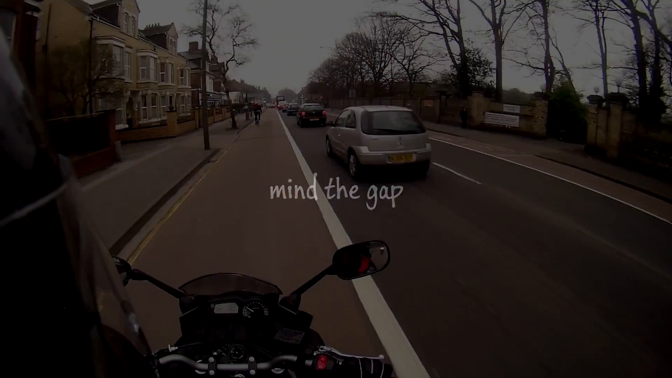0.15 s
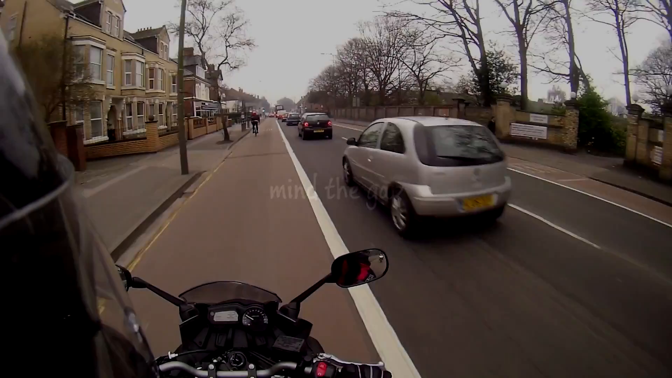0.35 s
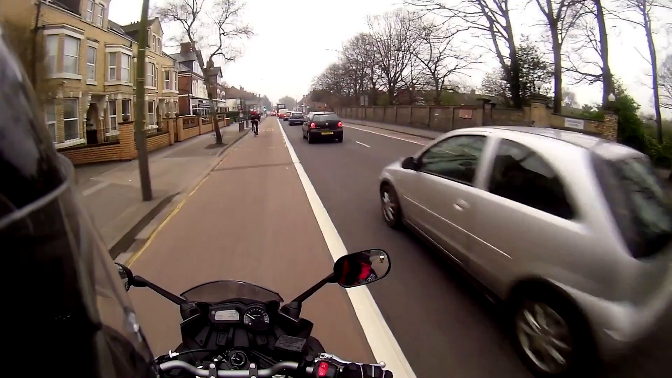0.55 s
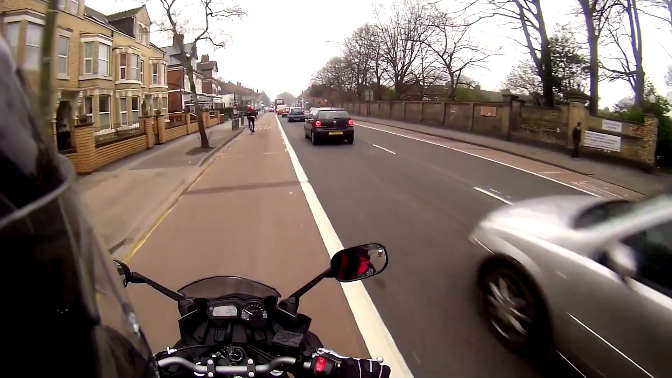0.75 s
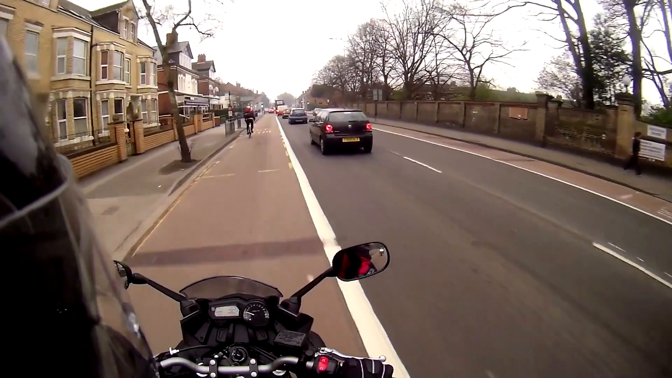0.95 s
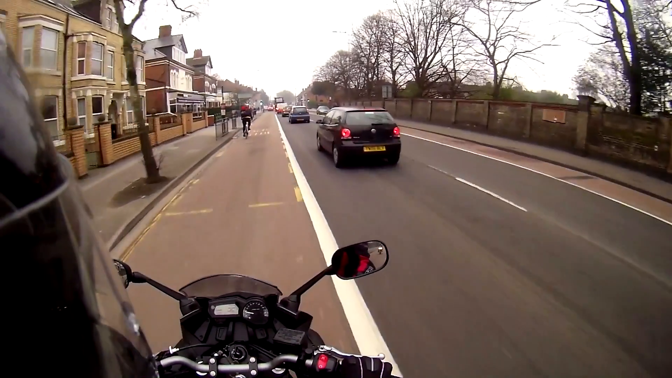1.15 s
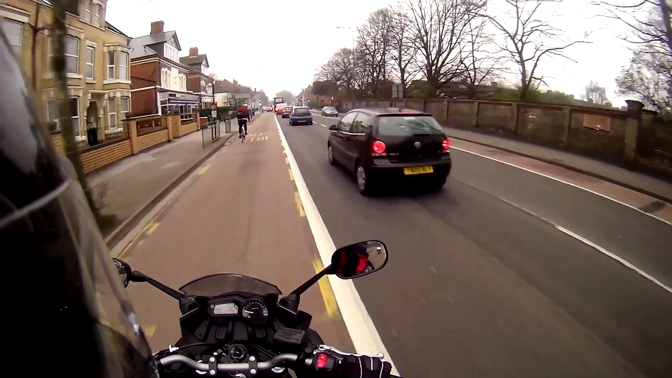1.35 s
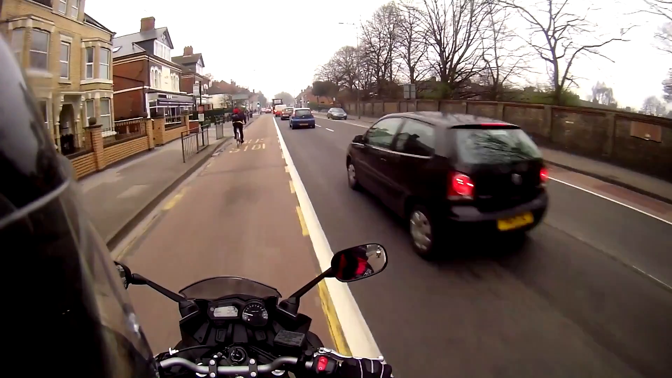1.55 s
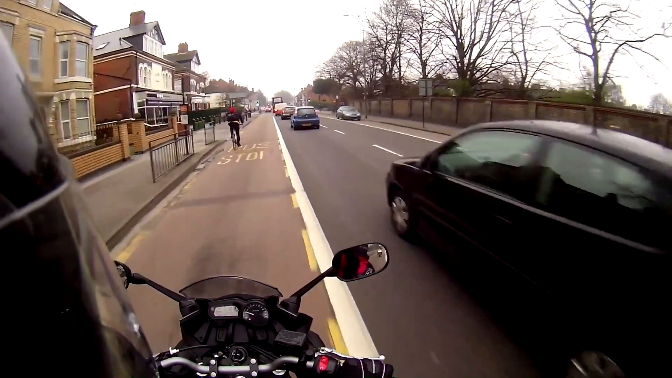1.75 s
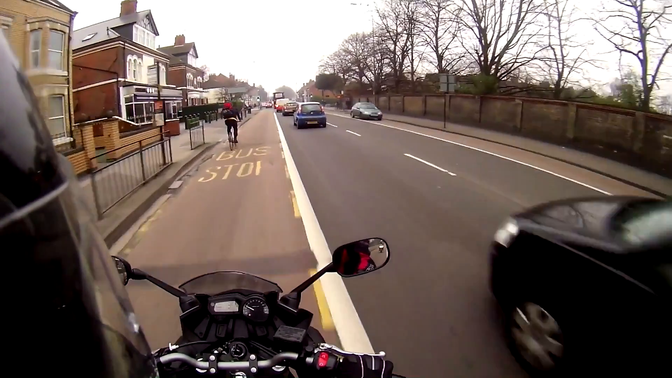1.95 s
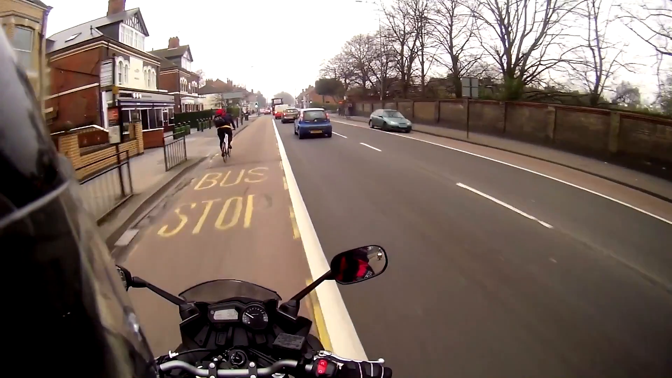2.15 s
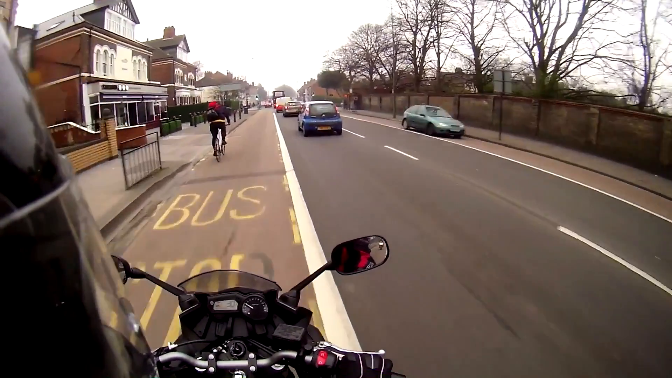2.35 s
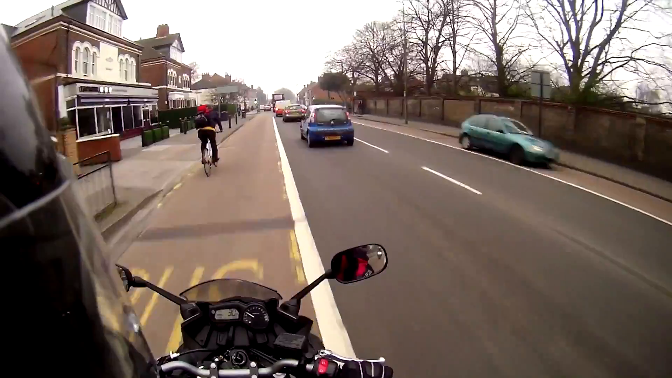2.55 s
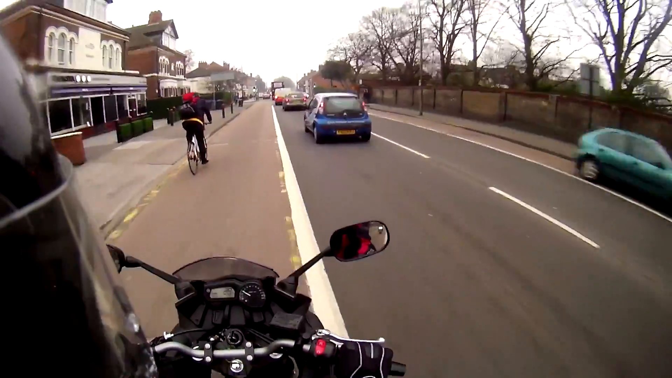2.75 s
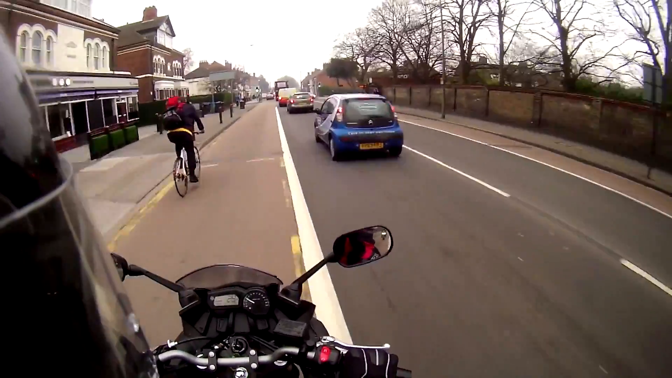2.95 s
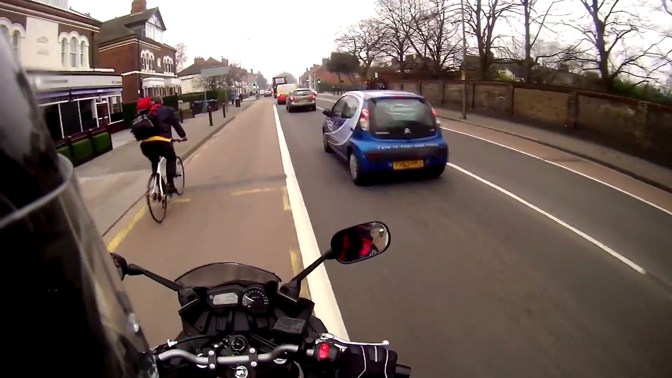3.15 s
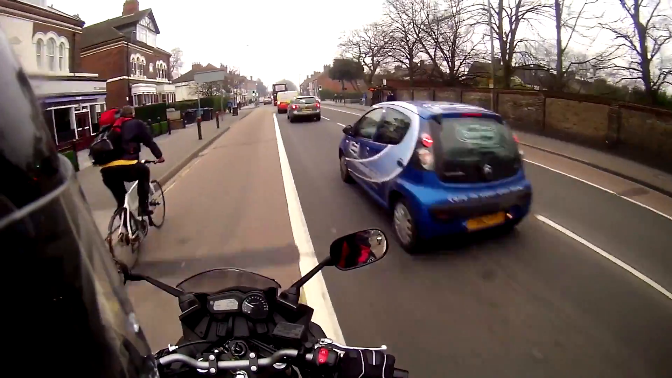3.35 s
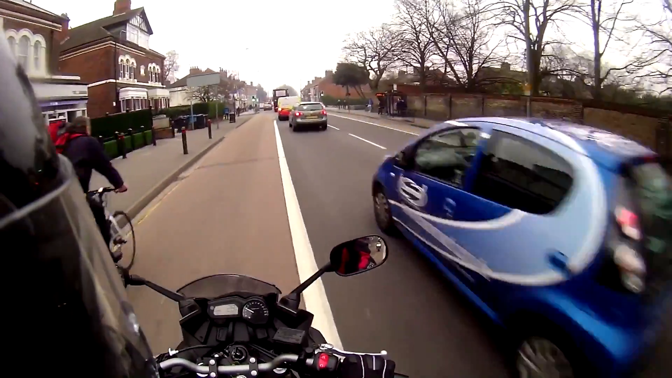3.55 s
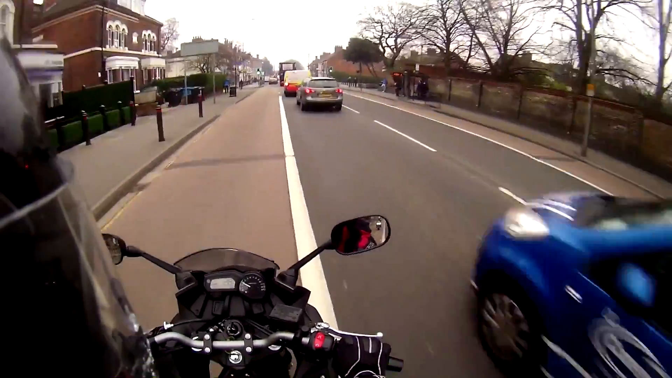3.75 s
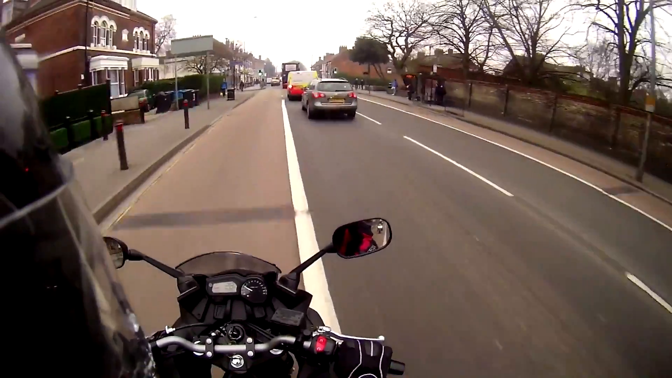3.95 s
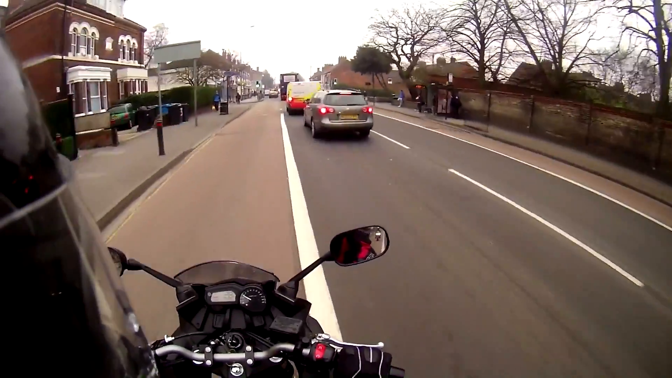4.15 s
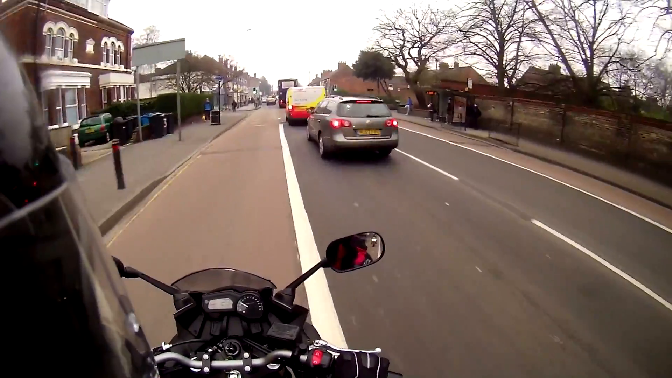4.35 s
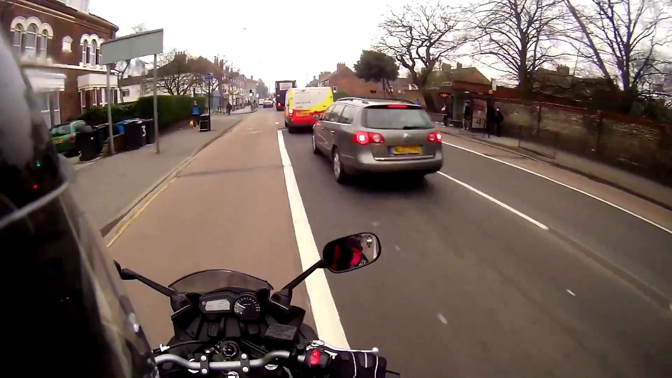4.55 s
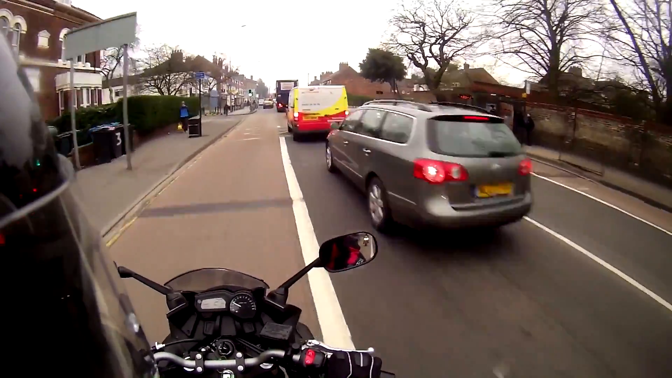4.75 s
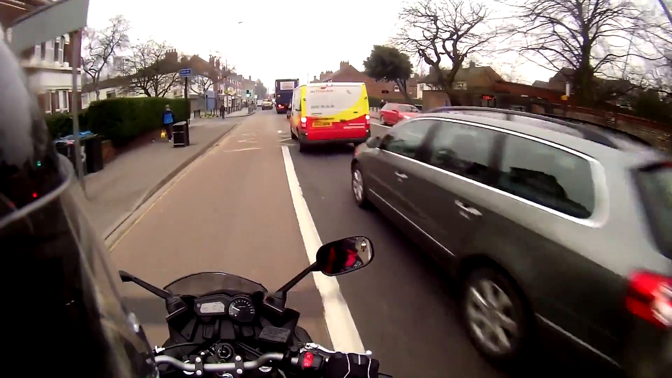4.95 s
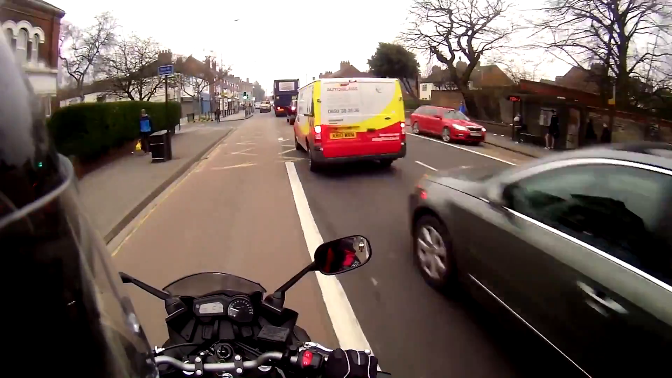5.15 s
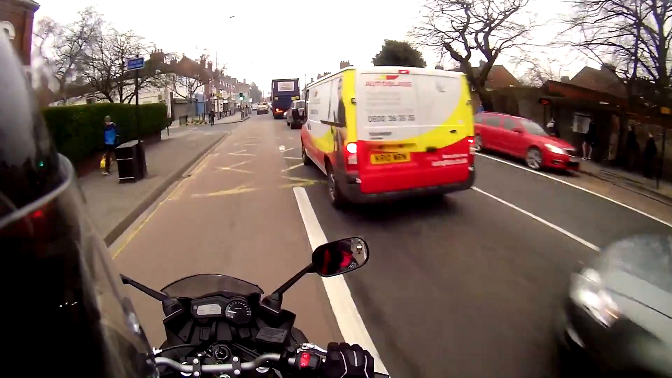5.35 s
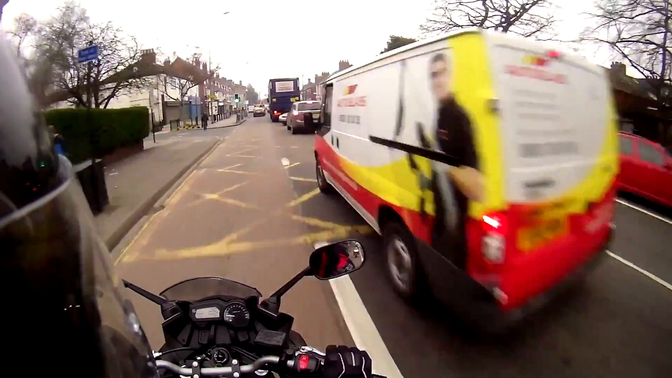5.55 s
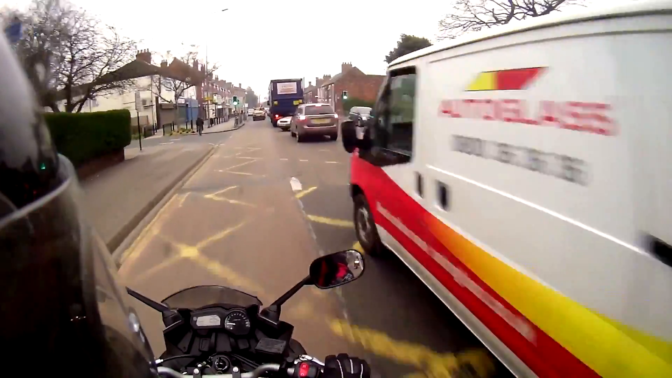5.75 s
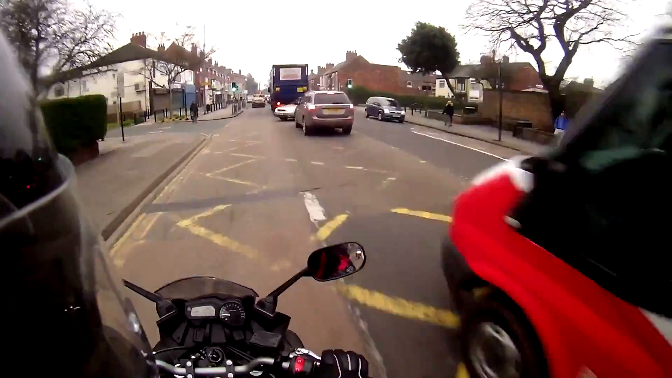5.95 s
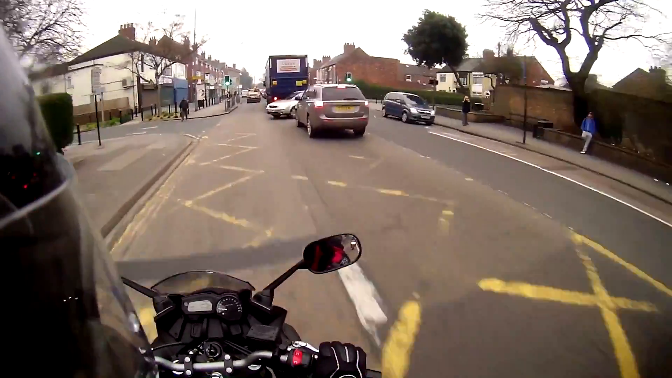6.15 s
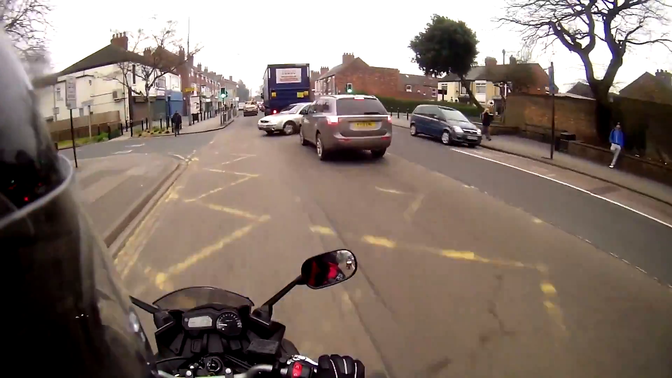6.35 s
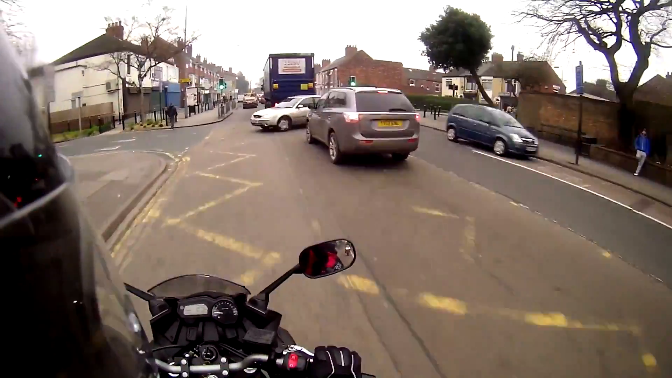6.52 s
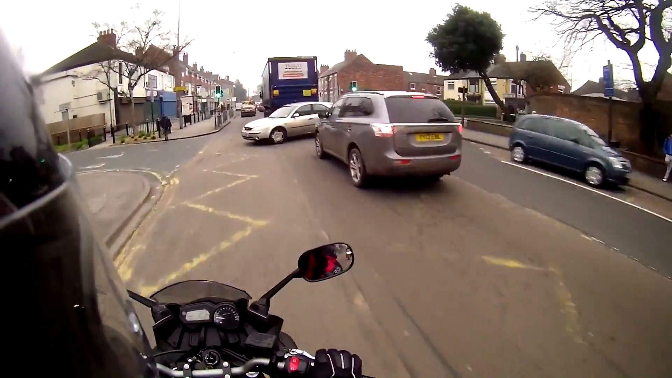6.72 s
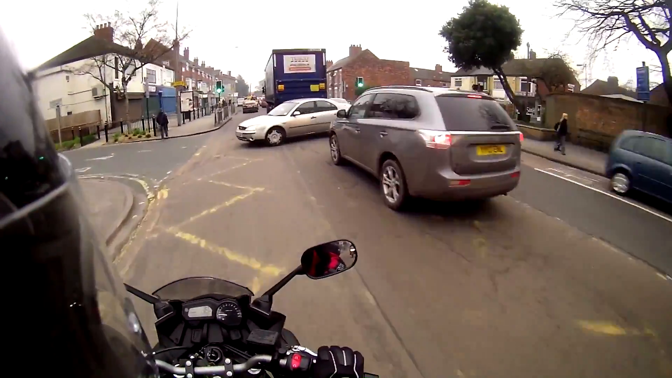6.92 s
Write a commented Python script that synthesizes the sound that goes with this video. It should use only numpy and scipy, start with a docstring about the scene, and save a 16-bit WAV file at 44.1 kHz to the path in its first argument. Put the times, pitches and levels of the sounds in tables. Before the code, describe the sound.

Wind rumble fades in abruptly and batters the microphone in irregular gusts. Under it a motorcycle engine hums low, rises with a downshift in the first second, slowly descends, and falls to idle around five seconds. Tyre and air hiss swell slightly beside passed cars; tiny squeaks and rasps, a wavering low howl and thin whines stay faint. Outdoor road, close onboard perspective, calmer at the end.

```python
"""On the road, beside a queue of cars: a helmet camera on a four-cylinder motorcycle that slows down.
Wind buffets the microphone port over the roar of air and tyres, all shaped noise, with narrow noise bands howling.
The engine, a stack of wavering sines, drops a gear, brakes the bike, and falls to idle when the clutch is pulled.
Squeaks are dying rings, rasps are puffs of noise, whines are soft-edged sines.
The camera housing colours the buffeting, the air and the rasps with its resonances."""
import sys
import numpy as np
from scipy import signal
from scipy.io import wavfile
from scipy.ndimage import uniform_filter1d

SR = 44100
rng = np.random.default_rng(int(sys.argv[2]) if len(sys.argv) > 2 else 0)


def to_wav(s):
    """Save 16-bit WAV."""
    ch = np.atleast_2d(s).T  # columns
    pcm = np.round(np.clip(ch, -1, 1) * 32767)  # PCM
    wavfile.write(sys.argv[1], SR, pcm.astype(np.int16))


N = 312228

# Engine speed through downshift, engine braking, clutch pull and idle: (time [s], crank speed [turns/s])
CRANK_SPEED = [(0.0, 46.4), (0.55, 46.5), (0.95, 52.4), (1.15, 51.6), (2.4, 48.2), (2.8, 46.3),
               (3.86, 44.2), (3.96, 43), (4.07, 43.9), (4.58, 42.8), (4.65, 43.5), (4.74, 42.1),
               (4.82, 43.1), (4.89, 41.2), (4.94, 33.4), (5.07, 32.2), (5.2, 27.5), (5.32, 24.4),
               (5.55, 22.8), (7.08, 22.5)]
# How hard the engine works: (time [s], effort [dB])
ENGINE_EFFORT = [(0.0, -6), (0.55, -5), (1.0, -2.5), (1.3, 0), (2.3, -5), (2.7, -5.5), (3.1, 1),
                 (3.5, -0.5), (3.9, 3), (4.0, 3.5), (4.45, 6), (4.85, 4), (4.92, 3), (4.98, 4), (5.1, -1),
                 (5.35, -1), (5.55, 0.5), (6.3, -0.5), (6.7, -1), (7.08, -0.5)]
# Loud engine partials: (multiple of crank speed, ...)
LOUD_ORDERS = (2, 4, 6, 10, 12, 3, 8, 17)
# One row per loud order: (level in gear [dB], level at idle [dB], share of the effort it follows)
ORDER_LEVELS = [(-36, -46, 0.46), (-46.5, -45, 0.54), (-50, -41, 0.51), (-49, -56, 0.42),
                (-48.5, -51, 1.43), (-46.5, -45, 0.27), (-54, -52, 0.2), (-76, -52, 1.2)]
# Orders left by uneven cylinders: (multiple of crank speed, level relative to order 10 [dB])
UNEVEN_ORDERS = [(5, -9), (7, -11.5), (11, -3.5), (14, -2), (22, -7)]
# Silencer, fading the uneven orders above its corner: (corner [Hz], slope [dB per octave])
SILENCER = (560, 60)
# Exhaust resonance that lifts an order passing through it: (frequency [Hz], width [Hz], boost [dB])
EXHAUST_PIPE = (505, 50, 3)
IN_GEAR_HZ, IDLE_HZ = 40, 24  # crank speeds between which the two order levels blend

# Levels of the moving air, lower at the end than in full ride:
# (time [s], buffeting [dB], air roar [dB], tyre rush [dB], treble hiss [dB])
RIDE_LEVELS = [(0.0, -31.5, -40.5, -56, -71), (0.15, -20.5, -36.5, -51.5, -66.5),
               (0.6, -19, -30, -49, -68.5), (1.0, -16.5, -31, -49.5, -65.5), (1.5, -22, -35, -48, -63.5),
               (2.3, -20, -33, -46.5, -62), (3.2, -18, -33.5, -47.5, -63.5), (4.0, -24, -35, -50, -64),
               (4.9, -22, -35.5, -50, -64.5), (5.35, -23.5, -37, -50.5, -67), (5.9, -28.5, -37, -52.5, -66),
               (6.35, -28.5, -40.5, -53.5, -68), (6.6, -36, -40, -53, -69.5), (7.08, -35, -46, -54, -71)]
# Gusts (+) and lulls (-) of the wind at the port: (time [s], level change [dB], width [s])
GUSTS = [(.28, 2.5, 0.042), (.37, 2, 0.033), (.5, -8, 0.049), (.75, 5, 0.03), (.83, 3.5, 0.04),
         (.94, 0.5, 0.041), (1.01, -18, 0.071), (1.15, 2, 0.062), (1.25, -7.5, 0.06), (1.32, 16, 0.014),
         (1.44, -4, 0.098), (1.58, 5.5, 0.078), (1.68, 8.5, 0.068), (1.76, 10, 0.03), (2.13, -7, 0.083),
         (2.2, 7.5, 0.1), (2.3, 7.5, 0.064), (2.54, -5.5, 0.025), (2.77, 4, 0.053), (2.85, -7.5, .05),
         (3.0, -9, 0.025), (3.2, -9.5, 0.15), (3.4, 4, 0.033), (3.55, -5.5, 0.041), (3.62, 6.5, 0.032),
         (4.14, 3, 0.25), (4.3, -4, 0.067), (4.48, -7.5, 0.068), (4.54, 17, 0.024), (4.89, -14.5, 0.032),
         (5.11, -7.5, 0.019), (5.33, 7, 0.15), (6.42, 3.5, 0.055)]
# Slow swelling (+) and thinning (-) of the buffeting: (time [s], level change [dB], width [s])
SWELLS = [(2.5, -1.5, 1), (3.2, -1.5, .5), (4.4, 2.5, 1), (5.8, -2, .6)]
# Cars passed throw the noise back: (time alongside [s], hiss lift [dB], width [s])
CAR_PASSES = [(.6, 6.5, 0.67), (1.93, 2, 0.3), (3.75, 2, 0.26), (5.0, .5, 0.17), (5.95, 2.5, 0.35)]
# Noise colours: (frequency [Hz], relative level [dB])
BUFFET_COLOUR = [(5.9, -31), (10, 5), (22, 3), (41, -3.5), (92, -12), (119, -26.5), (250, -31.5),
                 (320, -43.5), (550, -120)]
ROAR_COLOUR = [(59, -36.5), (100, -3.5), (119, 1.5), (231, -11), (463, -10.5), (509, -12), (801, -25.5),
               (1000, -27.5), (1300, -64), (2200, -120)]
RUSH_COLOUR = [(380, -16), (650, -1.5), (823, -15), (1130, -6), (1720, -12.5), (2310, -15), (2930, -23),
               (4000, -32), (5200, -57), (8800, -120)]
HISS_COLOUR = [(1650, -21), (2800, -3.5), (4530, -10), (5640, -10), (6500, -15), (7920, -13), (10500, -19),
               (11600, -32.5), (13000, -60.5)]
RASP_COLOUR = [(700, -2), (1500, 6), (2300, 8), (3300, -3), (5900, -2), (6800, -17), (8800, -12),
               (10500, -27), (12000, -45)]
# Resonances of the camera housing: (frequency [Hz], width [Hz], boost [dB])
HOUSING = [(470, 95, -0.5), (1083, 250, 3.5), (4160, 200, 0.5), (5300, 100, 1), (7860, 650, 1.5)]
DEEP_SPLIT_HZ = 45  # parts deep thumps from flutter
DEEP_DB, DEEP_PER_GUST_DB = -2, 0.5  # share of the deep thumps, and its growth per dB of gust
LUMPS_PER_S, LUMP_DB, DEEP_LUMP_DB = 30, 2.5, 2.5  # upper rate of the thumping; depth above and under the split
SHAKE_DB = 2  # the engine shakes the port once per firing cycle
HEADROOM = 0.38  # the largest pressure lumps flatten out near this height
ROAR_PER_GUST_DB, RUSH_PER_PASS_DB = 0.04, 0.5  # roar lift per dB of gust, rush lift per dB of pass

# Narrow noise bands howling at fixed pitches: (time [s], low howl [dB], high howls [dB])
HOWL_LEVELS = [(0, -62, -58), (.4, -62, -53), (1.1, -69, -73), (1.8, -44, -50), (2.2, -41.5, -54),
               (2.5, -51, -49.5), (2.85, -44, -52), (3.3, -52.5, -52), (4, -44.5, -52.5), (4.8, -50, -53),
               (5.2, -69, -64), (7.08, -51, -82)]
# The low howl: (frequency [Hz], width [Hz])
LOW_HOWL = (506, 22.3)
# The high howls: (frequency [Hz], width [Hz], relative level [dB])
HIGH_HOWLS = [(2020, 62, -10.5), (2318, 270, -9.5), (1595, 37, -21)]

# Thin squeaks: (time [s], level [dB], frequency [Hz], time to fall 60 dB [s])
SQUEAKS = [(.927, -63, 6230, .35), (.558, -65, 8000, 0.065), (.572, -63, 8000, .06),
           (5.056, -61, 5850, .08), (5.225, -66, 5900, .08)]
# Short rasps of lever and linkage: (time [s], level [dB], length [s])
RASPS = [(0.641, -47, 0.022), (.657, -57.5, .035), (0.906, -57, 0.026), (1.885, -61, 0.03),
         (5.63, -65, 0.03)]
# Thin whines and hums: (time [s], length [s], first pitch [Hz], last pitch [Hz], level [dB])
WHINES = [(4.2, .55, 1475, 1478, -65), (2.12, .5, 668, 655, -52), (6.05, .9, 1135, 1129, -63),
          (4.75, 1.55, 131, 109, -39), (1.78, .52, 4224, 4198, -78), (5.74, .26, 4140, 4200, -80),
          (5.98, .06, 4205, 4165, -75)]

FLOOR_DB, EDGE_HZ = -78.5, 14280  # microphone noise ahead of the filters, upper band limit


def gain_of(db):
    """Turns decibels into an amplitude factor."""
    return 10 ** (np.asarray(db) / 20)


def unit_rms(x):
    """Scales a signal to rms 1."""
    return x / np.sqrt(np.mean(x ** 2) + 1e-20)


def smooth_twice(x, size):
    """Two running means in a row, for a rounder average."""
    return uniform_filter1d(uniform_filter1d(x, size=size), size=size)


def curves(rows):
    """Draws every column of a table as a curve over the whole scene."""
    times, *columns = np.transpose(rows)
    return [np.interp(np.arange(N) / SR, times, column) for column in columns]


def bumps(rows):
    """Sums bell-shaped level changes in dB."""
    t = np.arange(N) / SR
    return sum(db * np.exp(-(2 * (t - centre) / width) ** 2) for centre, db, width in rows)


def resonance_db(hz, peak_hz, width_hz, boost_db):
    """Lift of a single resonance, halved in dB at half its width from the peak."""
    return boost_db / (1 + (2 * (hz - peak_hz) / width_hz) ** 2)


def add(mix, start, sound):
    """Lays a sound into the mix at start seconds."""
    part = mix[round(start * SR):][:len(sound)]
    part += sound[:len(part)]


def wander(hz):
    """Slow random drift up to about hz, rms 1, from smoothed knots 60 times a second."""
    knots = rng.standard_normal(int(N / SR * 60) + 2)
    knots = uniform_filter1d(knots, max(1, round(30 / hz)))
    return unit_rms(np.interp(np.arange(N) / SR * 60, np.arange(len(knots)), knots))


def noise(colour, patchy_db, flicker_db, size=1024):
    """Random short-time spectra through the housing, with drifting patches and a flicker shared by all bands."""
    hop = size // 4
    hz = np.fft.rfftfreq(size, 1 / SR)
    frames = N // hop + 5
    real, imaginary, patches = rng.standard_normal((frames, len(hz), 3)).T
    patches = uniform_filter1d(patches, size=9, axis=0)  # across frequency
    patches = unit_rms(uniform_filter1d(patches, size=10, axis=1))  # across time
    flicker = unit_rms(uniform_filter1d(rng.standard_normal(frames), size=4))
    colour_hz, colour_db = np.transpose(colour)
    shape_db = np.interp(np.log(hz + 1), np.log(colour_hz + 1), colour_db, left=-90, right=-90)
    shape_db += sum(resonance_db(hz, *resonance) for resonance in HOUSING)
    level_db = shape_db[:, None] + patchy_db * patches + flicker_db * flicker
    spectra = (real + 1j * imaginary) * gain_of(level_db)
    return unit_rms(signal.istft(spectra, nperseg=size, noverlap=size - hop)[1][:N])


def butter_filter(x, order, edge_hz, kind):
    """Runs a Butterworth filter with soft flanks."""
    return signal.sosfilt(signal.butter(order, edge_hz, kind, fs=SR, output="sos"), x)


def engine():
    """Orders of the crank as wavering sines; returns their sum and the crank angle in turns."""
    speed, = curves(CRANK_SPEED)
    effort_db, = curves(ENGINE_EFFORT)
    geared = np.clip((speed - IDLE_HZ) / (IN_GEAR_HZ - IDLE_HZ), 0, 1)
    hunting = 0.002 + 0.007 * (1 - geared)  # a free engine wavers more
    turns = np.cumsum(speed * (1 + hunting * wander(5) + 0.005 * wander(20))) / SR
    levels_db = [idle + (gear - idle) * geared + share * effort_db for gear, idle, share in ORDER_LEVELS]
    orders = list(zip(LOUD_ORDERS, levels_db))
    order_10_db = levels_db[3]
    corner_hz, slope_db = SILENCER
    for k, relative_db in UNEVEN_ORDERS:
        octaves_above = np.maximum(np.log2(k * speed / corner_hz), 0)
        orders.append((k, order_10_db + relative_db - slope_db * octaves_above))
    tones = np.zeros(N)
    for k, db in orders:
        pipe_db = resonance_db(k * speed, *EXHAUST_PIPE)
        unsteady_db = 0.7 * wander(3) + 1.2 * wander(14)
        sine = np.cos(2 * np.pi * (k * turns + rng.random()))
        tones += gain_of(db + pipe_db + unsteady_db) * sine
    return np.sqrt(2) * tones, turns


def buffeting(turns):
    """Pressure lumps at the port; the gusts set the level, so the noise's own swings are partly evened out."""
    gust_db = bumps(GUSTS)
    shake_db = SHAKE_DB * np.cos(np.pi * turns)  # two turns per firing cycle
    level_db = curves(RIDE_LEVELS)[0] + gust_db + bumps(SWELLS) + shake_db
    lumps = noise(BUFFET_COLOUR, patchy_db=0.5, flicker_db=0.6, size=4096)
    deep = butter_filter(lumps, 3, DEEP_SPLIT_HZ, "low")
    flutter = butter_filter(lumps, 3, DEEP_SPLIT_HZ, "high")
    # the wind comes in separate thumps, partly shared by both bands
    thumps = wander(LUMPS_PER_S)
    deep = deep * gain_of(DEEP_LUMP_DB * thumps)
    flutter = flutter * gain_of(LUMP_DB * (0.62 * thumps + 0.67 * wander(LUMPS_PER_S)))
    share = np.minimum(gain_of(DEEP_DB + DEEP_PER_GUST_DB * gust_db), 0.95)
    both = share * unit_rms(deep) + np.sqrt(1 - share * share) * unit_rms(flutter)
    swing = abs(smooth_twice(both ** 2, 2000)) + 0.05  # quick power average
    drift = abs(smooth_twice(both ** 2, 9000)) + 0.05  # slow power average
    steadied = unit_rms(both / swing ** 0.17 / drift ** 0.32)
    return HEADROOM * np.tanh(gain_of(level_db) * steadied / HEADROOM)


def air(turns):
    """Roar, rush and hiss as coloured noise; the engine's own clatter makes them throb a little with the crank."""
    _, roar_db, rush_db, hiss_db = curves(RIDE_LEVELS)
    throb = np.cos(2 * np.pi * turns) + 0.44 * np.cos(np.pi * turns)
    pass_db = bumps(CAR_PASSES)
    roar_db = roar_db + ROAR_PER_GUST_DB * bumps(GUSTS) + 0.87 * throb
    rush_db = rush_db + RUSH_PER_PASS_DB * pass_db + 0.3 * throb
    hiss_db = hiss_db + pass_db + 0.18 * throb
    roar = gain_of(roar_db) * noise(ROAR_COLOUR, patchy_db=0.3, flicker_db=0.77, size=2048)
    rush = gain_of(rush_db) * noise(RUSH_COLOUR, patchy_db=0.9, flicker_db=0.55)
    hiss = gain_of(hiss_db) * noise(HISS_COLOUR, patchy_db=1.0, flicker_db=0.66, size=512)
    return roar + rush + hiss


def howl_band(hz, width_hz):
    """One howl: noise narrowed to a band around a fixed pitch, rms 1."""
    edges_hz = [hz - width_hz / 2, hz + width_hz / 2]
    return unit_rms(butter_filter(rng.standard_normal(N), 2, edges_hz, "band"))


def howls():
    """Narrow noise bands at fixed pitches, one low and a group of high ones."""
    low_db, high_db = curves(HOWL_LEVELS)
    low = howl_band(*LOW_HOWL)
    high = sum(gain_of(db) * howl_band(hz, width_hz) for hz, width_hz, db in HIGH_HOWLS)
    return gain_of(low_db) * low + gain_of(high_db) * high


def squeaks():
    """Dying rings that throb and sag in pitch, each cut off after a quarter of a second."""
    out = np.zeros(N)
    t = np.arange(SR // 4) / SR
    onset = 1 - np.exp(-t / 0.0019)
    throb = 1 + 0.35 * np.cos(2 * np.pi * 62 * t)
    for start, db, hz, t60 in SQUEAKS:
        ring = np.sin(2 * np.pi * hz * t * (1 - 0.053 * t))
        add(out, start, gain_of(db - 60 * t / t60) * ring * onset * throb)
    return out


def rasps():
    """Lever and linkage scrapes: short soft-edged puffs of grainy noise."""
    out = np.zeros(N)
    grit = noise(RASP_COLOUR, patchy_db=1.0, flicker_db=0.5, size=256)
    grain = unit_rms(smooth_twice(rng.standard_normal(N), 60))
    grit = grit * gain_of(1.8 * grain)
    for start, db, length in RASPS:
        puff = signal.windows.tukey(round(length * SR), 0.5)
        add(out, start, gain_of(db) * puff * grit[round(start * SR):][:len(puff)])
    return out


def whines():
    """Each is a sine, wavering in pitch and level, that comes and goes softly."""
    out = np.zeros(N)
    for start, length, first_hz, last_hz, db in WHINES:
        size = round(length * SR)
        hz = np.linspace(first_hz, last_hz, size) * (1 + 0.0058 * wander(15)[:size])
        tone = np.sqrt(2) * np.sin(2 * np.pi * np.cumsum(hz) / SR)
        level = gain_of(db + 3.0 * wander(25)[:size])
        add(out, start, level * tone * signal.windows.tukey(size, 0.4))
    return out


def scene():
    """Sums all sources at one microphone."""
    tones, turns = engine()
    wind = buffeting(turns) + air(turns) + howls()
    return (tones + wind + squeaks() + rasps() + whines())[None]


def record(dry):
    """Adds microphone noise, blocks the slowest pressure changes, fades the last instant, limits the band."""
    noisy = dry + gain_of(FLOOR_DB) * rng.standard_normal(dry.shape)
    coupled = butter_filter(noisy, 1, 6, "high")
    faded = coupled * np.minimum(np.arange(N)[::-1] / (0.008 * SR), 1)
    band_limit = signal.firwin(511, EDGE_HZ, window=("kaiser", 9), fs=SR)
    return signal.oaconvolve(faded, band_limit[None], "same")


dry = scene()
out = record(dry)
to_wav(out)
```